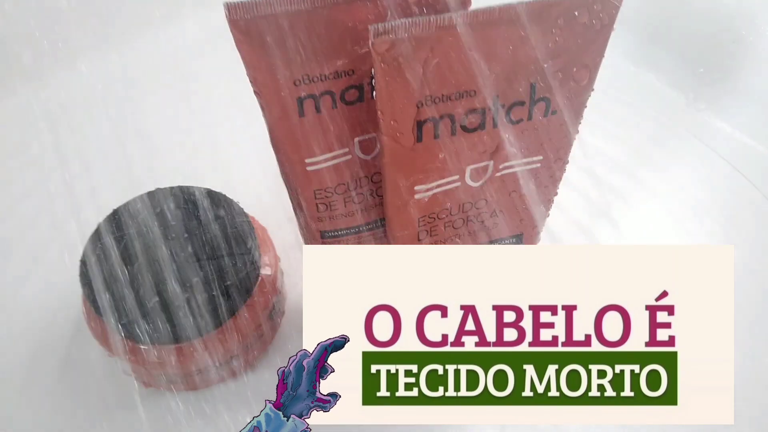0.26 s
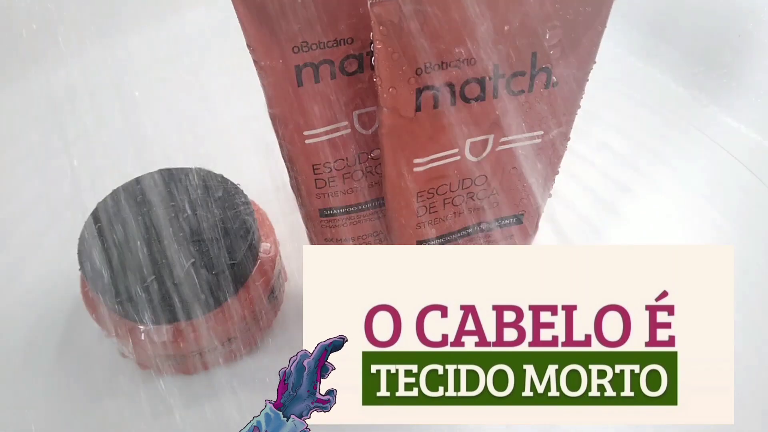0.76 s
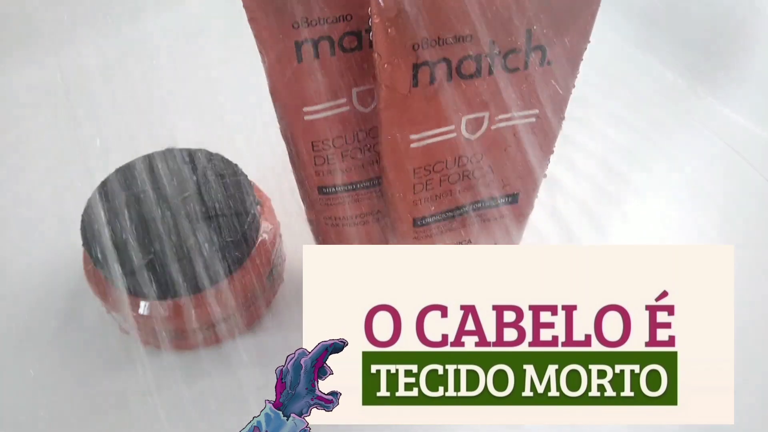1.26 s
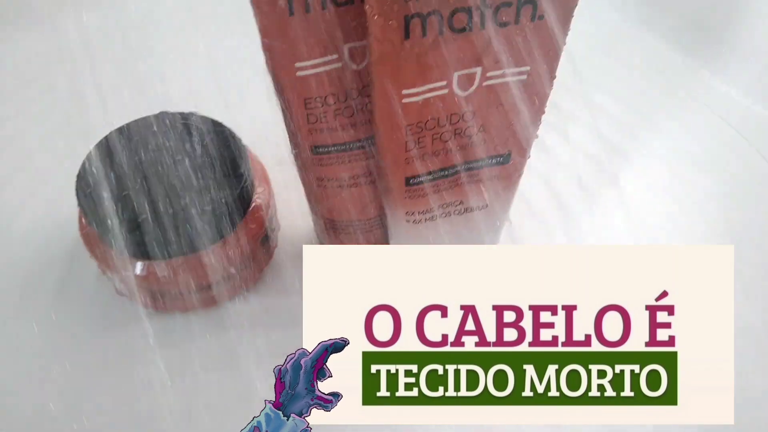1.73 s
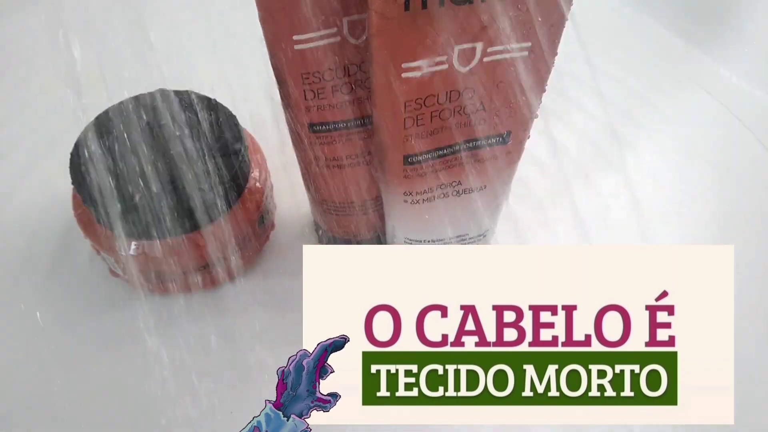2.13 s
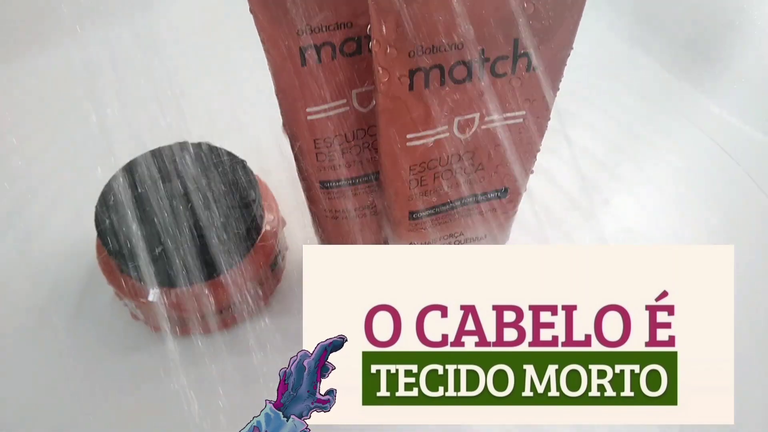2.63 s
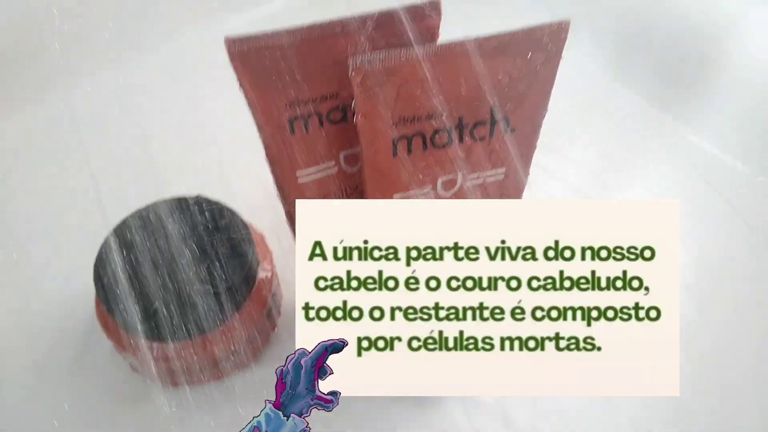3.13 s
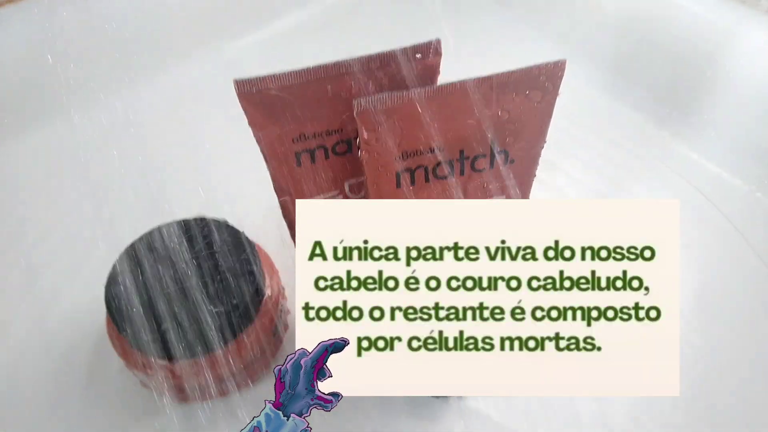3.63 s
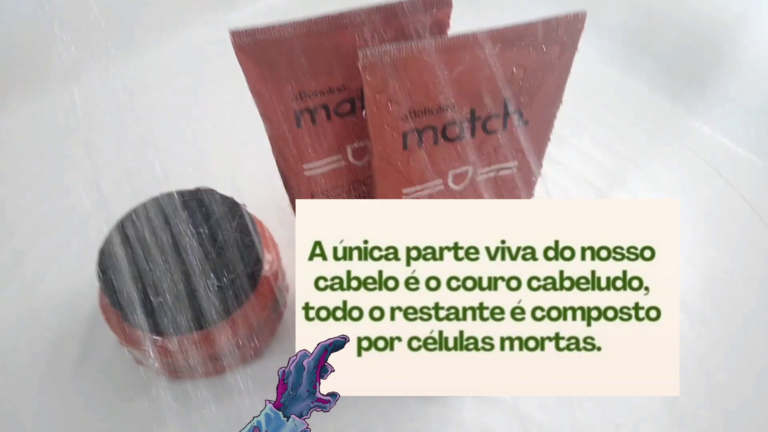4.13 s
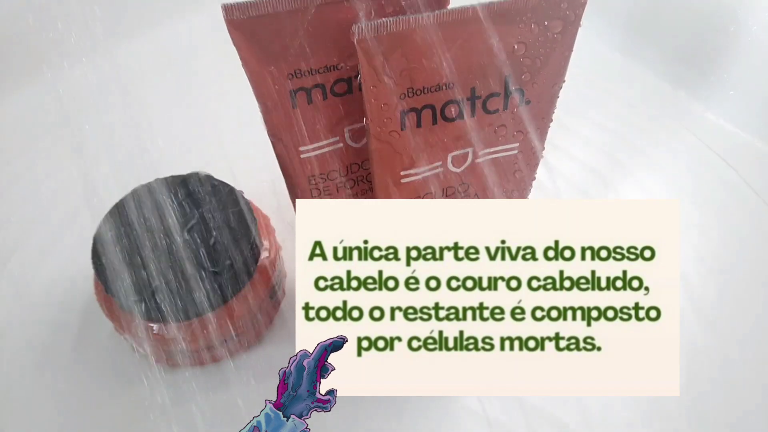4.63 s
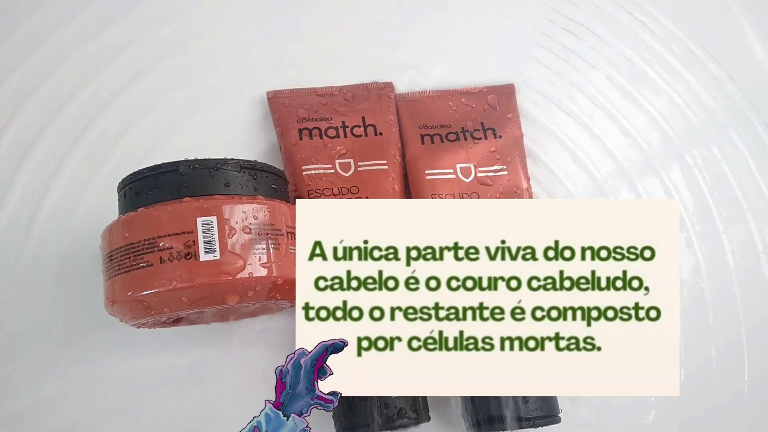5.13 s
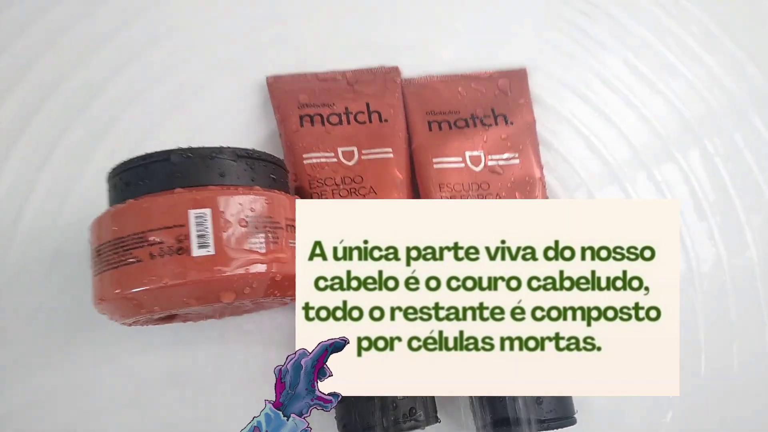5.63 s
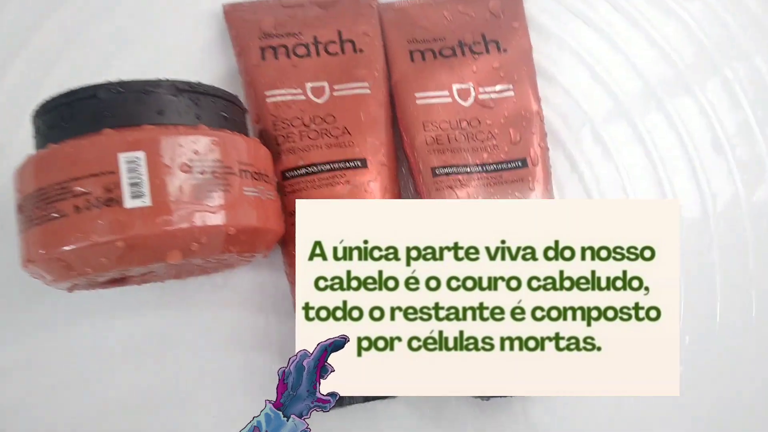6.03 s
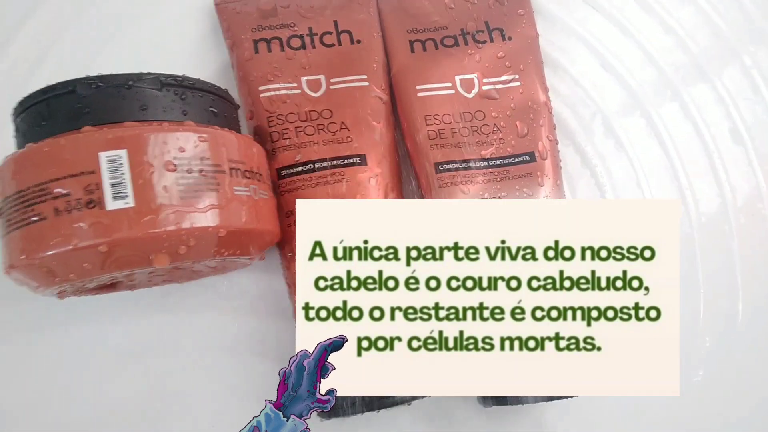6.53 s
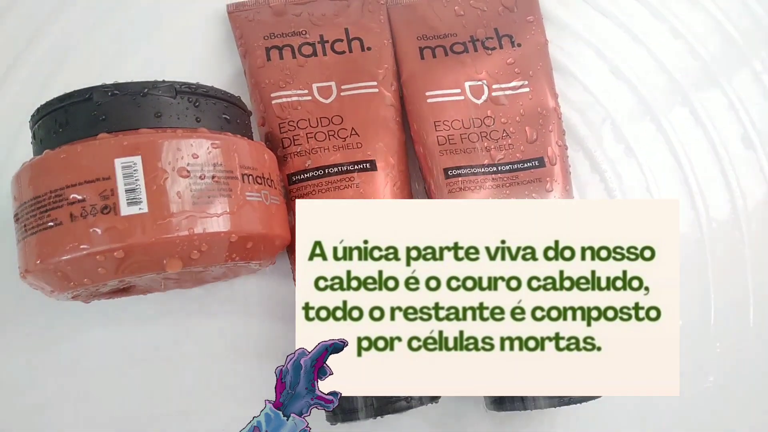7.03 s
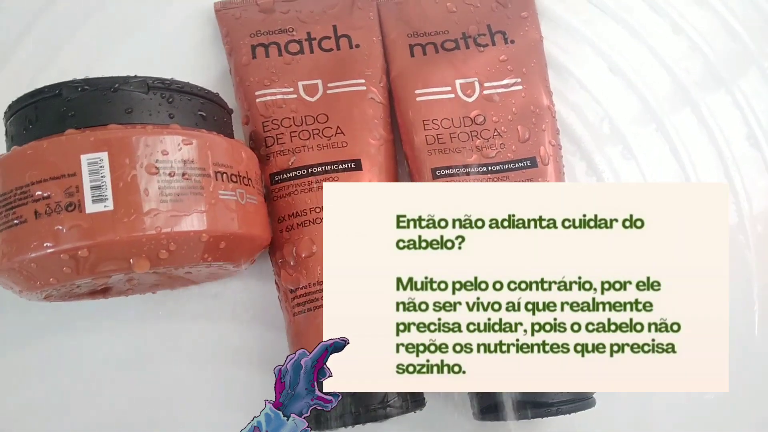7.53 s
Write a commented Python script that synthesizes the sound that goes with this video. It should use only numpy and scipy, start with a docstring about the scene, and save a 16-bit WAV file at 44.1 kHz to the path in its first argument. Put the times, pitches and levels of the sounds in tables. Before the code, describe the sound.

Shower water sprays steadily into a tub, drumming low and pattering on plastic tubes and a jar, with tiny bubbles and plops. A little past halfway the sound cuts to a brief silence. It fades back much quieter with the spray off: a thin hiss and high whistle from the valve, scattered drips and a soft handling bump. The microphone is close, in a small tiled bathroom with a faint low hum.

```python
"""A shower drums on a tub, rattles on plastic tubes and a jar, and splashes into tiny ringing bubbles.
The sound cuts to a short silence and fades back in with a soft thump. Now the spray is off: water
hisses and whistles thinly in the valve, and last drips tick off the wet plastic.
Room air and a low mains hum lie under both parts, in a small tiled room. We listen from close by,
through a hand-held phone whose two microphone ports favour different parts of the treble."""
import sys
import numpy as np
from scipy import signal
from scipy.fft import rfft, irfft, next_fast_len
from scipy.io import wavfile
from scipy.ndimage import map_coordinates

SR = 44100
rng = np.random.default_rng(int(sys.argv[2]) if len(sys.argv) > 2 else 0)


def materialize(psi):
    """Save the field psi as 16-bit PCM at rate SR to the path in sys.argv[1].

    A 1-D psi becomes a single channel; in a 2-D psi each row is a channel.
    """
    bounded = np.clip(np.atleast_2d(psi).T, -1, 1)
    quanta = np.round(bounded * 32767).astype(np.int16)
    wavfile.write(sys.argv[1], SR, quanta)


N = 342216

# Table levels are relative: each layer adds its own trim.
# strength of the spray as it plays over the objects: t/s, level/dB
SPRAY_STRENGTH = [(0, -41.5), (1.2, -41), (2.18, -41.5), (2.26, -40), (2.34, -44), (2.7, -42), (3.2, -42.5),
                  (3.7, -42.5), (4.8, -42.5)]
# the tub's modes: f/Hz, width/Hz, level/dB, left-right/dB
TUB_MODES = [(215.3, 3, -8.5, 5.5), (244.3, 13, -10, -1.5), (297, 25, -9, 3), (406, 9.3, -8.5, 0.5),
             (420, 11, -2, -2.5), (460, 30, 3.5, -1), (513, 33, -3, 2), (587, 23, -0.5, -6),
             (601, 4.3, -9.5, -10), (645, 16, -7.5, -6), (623, 12, -18, -9.5), (760, 25, -47.5, 10),
             (855, 78, -16.5, -5.5), (912, 22, -23, -9), (1080, 66, -12, -0.5), (1240, 17, -19, 7.5),
             (1345, 32, -22.5, 3)]
# resonances of the hollow tubes and the jar: f/Hz, width/Hz, lift/dB
PLASTIC_MODES = [(1558, 60, 11), (1700, 47, 8), (2000, 54, 1.5), (2700, 85, 9.5), (2890, 100, 11.5),
                 (3400, 70, 2), (3610, 29, -1), (3922, 36, 9), (4270, 120, 6.5)]
# tone of the splash, the fine mist and the room air: f/Hz, level/dB
SPLASH_EQ = [(700, -32), (950, -14), (1350, -15), (1650, -4.5), (2300, 1), (2900, -3.5), (3400, 4),
             (4200, -6.5), (5000, -9), (7000, -7.5), (11000, -70.5)]
MIST_EQ = [(2650, -9), (4500, 2), (4980, -17), (7070, 5.5), (7900, 4.5), (8550, -6), (9870, -3),
           (10900, -12.5), (12900, -16.5), (15200, -10), (16000, -23.5)]
AIR_EQ = [(20, -6), (38, -11), (75, -12), (95, -18.5), (135, -20), (200, -23), (290, -19), (340, -28),
          (560, -28), (700, -33), (1000, -33), (1200, -40.5), (1800, -62.5), (3000, -120)]
# the loudest bubbles under the spray: t/s, level/dB, f/Hz, snap/dB
LOUD_BUBBLES = [(0.1271, -22.5, 7440, -38), (0.2488, -25, 7400, -38.5), (0.2982, -20.5, 7300, -43),
                (0.3711, -14, 7400, -33), (0.4479, -25.5, 7360, -47.5), (0.6938, -23, 7370, -37.5),
                (1.4556, -35, 7300, -40), (1.7569, -30, 7650, -42), (1.9165, -20.5, 6800, -46),
                (2.0318, -22, 7840, -40.5), (2.2418, -35.5, 7280, -40), (2.4139, -29, 7190, -39),
                (2.4948, -33.5, 9960, -39), (2.6095, -32, 7200, -42), (2.7053, -30, 7500, -38),
                (2.7367, -21.5, 7660, -38), (3.1168, -36.5, 9600, -38.5), (3.3119, -34.5, 7210, -45.5),
                (3.7065, -28.5, 7400, -40), (4.0467, -30, 6450, -37), (4.4712, -28.5, 7160, -43)]
# tone of a tearing water film: f/Hz, level/dB
SNAP_EQ = [(1500, -23.5), (4500, -3.5), (7000, -1.5), (10000, 3), (12000, -10.5), (16000, -12)]
# fat drops landing in pooled water: t/s, level/dB, f/Hz
POOL_PLOPS = [(0.8147, -26.5, 2050), (1.109, -26.5, 2950), (1.6774, -28, 2920), (2.0143, -30, 2080),
              (2.2006, -26, 2040), (2.3183, -29, 2800), (3.15, -31, 2040), (3.5189, -31.5, 1930)]
# tone of the water in the valve: f/Hz, level/dB
HISS_EQ = [(900, -23), (1300, -18), (1600, -9), (2100, -7.5), (2600, -1.5), (3800, -2), (4900, -12),
           (6000, -8.5), (6800, 2), (7700, 5), (8400, -4.5), (10500, -10), (11600, -20), (15800, -19.5)]
# resonances of the valve and pipe: f/Hz, width/Hz, lift/dB
VALVE_MODES = [(1450, 48, 5), (2382, 22, 11), (2645, 77, 8), (2880, 83, 5.5), (3630, 25, 6.5),
               (3710, 46, 2.5), (5670, 70, 3.5), (5720, 55, 6.5), (6220, 89, 7.5), (7100, 68, 2),
               (7820, 83, 7.5), (7850, 47, 6.5), (9370, 97, 10.5), (9860, 27, 17), (10840, 120, 10),
               (14147, 160, 7.5)]
# the valve's main whistle: f/Hz, width/Hz, level/dB, left-right/dB
WHISTLE_MODES = [(7510, 34, 7, 0.5), (7270, 110, 3.5, 2), (7240, 69, -9, 0.5)]
# last drips off the plastic: t/s, level/dB, f/Hz, snap/dB
LAST_DRIPS = [(5.221, -37, 4800, -52), (5.4514, -33, 6330, -46), (5.946, -41.5, 4300, -50),
              (5.961, -40, 3180, -55), (6.107, -32.5, 3980, -39), (6.4333, -39, 6250, -50),
              (6.4825, -41, 7060, -43), (6.5134, -46, 9500, -34.5), (6.6326, -39.5, 2900, -39),
              (6.6677, -37.5, 6200, -39.5), (6.7845, -37.5, 3660, -50), (6.798, -29, 6770, -47),
              (7.1765, -33, 4170, -31), (7.456, -44, 5850, -39.5), (7.6264, -44, 3030, -42.5)]
# the hand on the phone: t/s, thud/dB, rub/dB
HAND_BUMPS = [(5.413, -70, -46.5), (7.122, -41, -59)]
# tone of the hand's rub: f/Hz, level/dB
RUB_EQ = [(300, -16), (900, -12), (1550, -1), (2400, -1), (5000, -14), (9000, -42.5)]
# reverb time of the tiled walls: f/Hz, t60/s
TILE_DECAY = [(300, 0.58), (3000, 0.3), (8000, 0.29), (15000, 0.12)]
# how much louder the left port hears than the right: f/Hz, left-right/dB
PORT_BALANCE = [(1200, 0.5), (2200, 3.5), (3100, 12.5), (4200, 9.5), (5000, 3), (6200, 14.5), (7200, 11),
                (8000, 23.5), (8800, -2), (9700, -9), (11000, -2.5), (13000, 0.5), (15500, 9.5)]

CUT_S, RESUME_S = 4.835, 5.192  # the silence lies between these
TOP_HZ = 15950
TIME = np.arange(N) / SR


def amp(db):
    """Decibels to gain."""
    return 10 ** (np.asarray(db) / 20)


def unit(x):
    """Scale a stereo pair so that its centre has rms 1."""
    return x / np.sqrt(np.mean(x.mean(0) ** 2) + 1e-20)


def along(points, hz):
    """Read (Hz, value) points on a log axis."""
    f, v = np.transpose(points)
    return np.interp(np.log(hz + 1), np.log(f + 1), v)


def noise(length=N):
    """Stereo white noise."""
    return rng.standard_normal((2, length))


def wobble(rate):
    """A smooth random curve, rate knots a second."""
    return map_coordinates(rng.standard_normal(int(N * rate / SR) + 4), [TIME * rate])


def filtered(x, response):
    """x through a complex frequency response."""
    size = next_fast_len(N + SR // 2)
    return irfft(rfft(x, size) * response(np.fft.rfftfreq(size, 1 / SR)), size)[..., :N]


def coloured(x, spectrum):
    """x through an EQ curve of (Hz, dB) points."""
    return filtered(x, lambda hz: amp(along(spectrum, hz)))


def panned(db):
    """Constant-power gains for a left-right difference."""
    ratio = amp(np.atleast_1d(db))
    return np.array([ratio, np.ones_like(ratio)]) * np.sqrt(2 / (1 + ratio ** 2))


def bandpass(f, hz, width):
    """Response at f of one resonance centred on hz."""
    return 1j * f * width / (hz * hz - f * f + 1j * f * width)


def resonate(x, modes):
    """x through a body's resonances, each with its own pan."""
    return filtered(x, lambda f: sum(panned(side) * amp(db) * bandpass(f, hz, width)
                                     for hz, width, db, side in modes))


def lifted(x, modes):
    """x with a narrow boost at each resonance."""
    return filtered(x, lambda f: 1 + sum((amp(db) - 1) * bandpass(f, hz, width)
                                         for hz, width, db in modes))


def spread(pair, alike):
    """Set the stereo width of two unrelated signals from (Hz, correlation) points."""
    turn = lambda hz: np.arccos(np.clip(along(alike, hz), -1, 1)) / 2
    mid, side = filtered(pair, lambda hz: np.array([np.cos(turn(hz)), np.sin(turn(hz))]))
    return np.array([mid + side, mid - side])


def nearer_right(x, lag_ms):
    """The sound reaches the right port a moment before the left."""
    return filtered(x, lambda hz: np.exp(np.pi * 1j * np.outer([-1, 1], hz) * lag_ms / 1000))


def add(track, s, sound):
    """Mix a sound into the track at time s."""
    start = max(round(s * SR), 0)
    part = track[:, start:start + sound.shape[-1]]
    part += sound[..., :part.shape[1]]


def patter(rate, size_db):
    """Two streams of drop impacts at random moments, log-normal in size."""
    hits = rng.random((2, N)) < rate / SR
    return hits * amp(size_db * np.clip(noise(), -3, 2.5)) * rng.choice([-1, 1], (2, N))


def spatter(rate, size_db, t60, wet_db):
    """Each drop shatters in a brief burst of noise and leaves a faint tail in the room."""
    age = np.arange(SR // 4) / SR
    burst, tail = amp(-120 * age / t60), amp(-120 * age / TILE_DECAY[1][1])  # power envelopes
    shape = burst / burst.sum() + amp(2 * wet_db) * tail / tail.sum()
    power = np.abs(signal.fftconvolve(patter(rate, size_db)[0] ** 2, shape)[:N])
    return np.sqrt(power) * noise()


def tub_drum():
    """Thousands of drops a second drum on the tub and ring its low modes."""
    hits = spread(patter(2500, size_db=3.5), [(200, 0.91), (460, 0.9), (650, 0.8), (1200, 0.31)])
    return nearer_right(unit(resonate(hits, TUB_MODES)), lag_ms=0.13)


def splash():
    """Drops rap and shatter on the tubes and the jar, which lend them a hollow colour."""
    raps = spread(patter(1800, size_db=2.5), [(1000, 0.5), (1700, 1), (2700, 0.59), (4000, 0.25)])
    raps = unit(nearer_right(raps, lag_ms=0.14))
    shatter = amp(2) * unit(spatter(4000, size_db=7, t60=0.0052, wet_db=-7))
    return unit(lifted(coloured(raps + shatter, SPLASH_EQ), PLASTIC_MODES))


def mist():
    """Fine droplets sizzle on top; the few nearest drops crackle out of them."""
    sizzle = unit(coloured(spatter(1700, size_db=3, t60=0.005, wet_db=-7), MIST_EQ))
    near_drops = spatter(55, size_db=15.5, t60=0.0057, wet_db=-2.5)
    crackle = coloured(near_drops, [(4000, -35), (7000, -1.5), (10000, 0), (12000, 0), (16000, -7)])
    return sizzle + amp(-6.5) * unit(crackle)


def spray():
    """One spray strength rides the levels of drum, splash and mist until the cut."""
    times, levels = np.transpose(SPRAY_STRENGTH)
    strength_db = np.interp(TIME, times, levels)
    flow = wobble(14)  # the jets wander on and off the objects
    low, middle, top = tub_drum(), splash(), mist()
    drum_db = strength_db - 1.42 + 0.68 * flow + 0.4 * wobble(6)
    splash_db = strength_db - 4.5 + 0.4 * flow
    push_db = 1.4 * (strength_db - levels.mean())  # harder jets shatter finer
    mist_db = levels.mean() - 12.5 + push_db + 0.94 * wobble(25)
    return (TIME < CUT_S) * (amp(drum_db) * low + amp(splash_db) * middle + amp(mist_db) * top)


def room_tone():
    """A bed of low room air, a subsonic sway and a wavering mains hum."""
    air = unit(coloured(spread(noise(), [(40, 0.3), (200, 0.5), (700, 0.6), (1200, 0.1)]), AIR_EQ))
    sway = unit(coloured(noise(), [(1, 0), (4, 2.5), (9, -9), (20, -12.5), (45, -64), (90, -120)]))
    hum = np.sqrt(2) * np.sin(2 * np.pi * 100.3 * TIME)
    return amp(-57) * air + amp(-52.5) * sway + amp(-68 + 1.6 * wobble(4.8)) * hum


def ping(hz, cycles, glide, swell=1.15):
    """A bubble of peak 1: it swells softly, rings for a few cycles and rises in pitch."""
    age = np.arange(SR // 80) * hz / SR  # in cycles
    fade = np.exp(-age / cycles)
    attack = 1 - np.exp(-(age / swell) ** 2)
    phase = age + glide * (age - cycles * (1 - fade))
    ring = np.sin(2 * np.pi * phase) * fade * attack
    return ring / np.abs(ring).max()


def fizz(count=80):
    """Faint bubbles burst in the film of water under the spray."""
    track = np.zeros((2, N))
    pitches = 7200 * np.exp(0.307 * rng.standard_normal(count))
    for (when, size), hz in zip(rng.random((count, 2)), pitches):
        ring = ping(min(hz, TOP_HZ), cycles=9.1, glide=0.056)
        add(track, when * CUT_S, amp(-44.5 + 10 * size ** 2) * ring)
    return track


def snap(t60):
    """A water film tears with a tick of noise."""
    age = np.arange(SR // 80) / SR
    return noise(len(age)) * amp(-60 * age / t60)


def bubbles(cues):
    """Each cue (t/s, level/dB, f/Hz, snap/dB) snaps and rings briefly, a little to the right."""
    rings, snaps = np.zeros((2, 2, N))
    for s, db, hz, snap_db in cues:
        add(rings, s, amp(db + 1) * panned(-3) * ping(hz, cycles=2.6, glide=0.011, swell=2.6))
        add(snaps, s, amp(snap_db + 12.5) * snap(t60=0.0066))
    return rings + coloured(snaps, SNAP_EQ)


def small_bubble_cues(per_s=6, most=60, snap_db=-9):
    """Small bubbles, scattered around one size, burst at random while the spray runs."""
    times = np.cumsum(rng.exponential(1 / per_s, most))
    levels = -37 + 3.5 * rng.standard_normal(most)
    pitches = 7250 * np.exp(0.074 * rng.standard_normal(most))
    return [(s, db, hz, db + snap_db) for s, db, hz in zip(times, levels, pitches) if s < CUT_S]


def plops():
    """Fat drops plop into the pooled water."""
    track = np.zeros((2, N))
    for s, db, hz in POOL_PLOPS:
        add(track, s, amp(db - 2.5) * ping(0.97 * hz, cycles=1.8, glide=0.062))
    return track


def splat_cues(at_s=3.4645, length_s=0.0015, count=5):
    """One fat drop splats into a handful of bubbles, the big low ones first."""
    times = at_s + np.linspace(0, length_s, count)
    return [(s, -22, hz, -47.5) for s, hz in zip(times, np.geomspace(4810, 8830, count))]


def plumbing(ease_at_s=5.8, ease_s=0.25):
    """With the spray off, water squeezes through the valve: a thin hiss and a whistle that eases off."""
    rush = spatter(2200, size_db=6, t60=0.018, wet_db=-1.5)
    hiss = unit(lifted(coloured(rush, HISS_EQ), VALVE_MODES))
    whistle = unit(resonate(noise(), WHISTLE_MODES))
    hiss_db = -51 + 0.27 * wobble(13)
    whistle_db = -50.5 - 6 * np.clip((TIME - ease_at_s) / ease_s, 0, 1) + 1.7 * wobble(11)
    return (TIME > CUT_S) * (amp(hiss_db) * hiss + amp(whistle_db) * whistle)


def drips():
    """Last drips fall off the wet plastic, each a tick and a short ring."""
    rings, snaps = np.zeros((2, 2, N))
    for s, db, hz, snap_db in LAST_DRIPS:
        add(rings, s, amp(db + 5) * ping(hz, cycles=3.2, glide=0.02, swell=1))
        add(snaps, s, amp(snap_db) * snap(t60=0.0097))
    return rings + coloured(snaps, SNAP_EQ)


def handling():
    """The hand softly bumps and rubs the phone."""
    track = np.zeros((2, N))
    thud = np.sin(2 * np.pi * 135 * TIME) * amp(-60 * TIME / 0.058)
    thud += 0.5 * np.sin(2 * np.pi * 250 * TIME) * amp(-60 * TIME / 0.022)
    for s, thud_db, rub_db in HAND_BUMPS:
        rub = unit(coloured(noise(), RUB_EQ)) * amp(-60 * TIME / 0.095)
        add(track, s, amp(thud_db) * thud + amp(rub_db - 1) * rub)
    return track


def bathroom(x, near_db=-1, wet_db=-4.5, near_t60=0.031):
    """Direct sound, quick reflections inside the tub and the tail of the tiled walls."""
    hz, t, bands = signal.stft(noise(SR // 3), SR, nperseg=256)
    walls = signal.istft(bands * amp(-60 * t / along(TILE_DECAY, hz)[:, None]), SR, nperseg=256)[1]
    age = np.arange(walls.shape[1]) / SR
    near = noise(len(age)) * amp(-60 * age / near_t60)
    echo = amp(near_db) * near / np.linalg.norm(near[0]) + amp(wet_db) * walls / np.linalg.norm(walls[0])
    echo = np.pad(echo, ((0, 0), (SR // 1000, 0)))  # 1 ms pre-delay
    return x + signal.fftconvolve(x, echo, axes=1)[:, :N]


def scene():
    """The full mix; the single bubbles and drops go through the bathroom reverb."""
    bed = spray() + room_tone()
    drops = fizz() + bubbles(LOUD_BUBBLES + small_bubble_cues() + splat_cues()) + plops() + drips()
    return bed + bathroom(drops) + plumbing() + handling()


def record(dry):
    """The ports colour each side; the mix mutes, then fades in on a soft thump, all under a high cut."""
    heard = filtered(dry, lambda hz: panned(along(PORT_BALANCE, hz)))
    resumed = TIME > RESUME_S
    fader = (TIME < CUT_S) + resumed * np.clip(0.044 + (TIME - RESUME_S) / 0.32, 0, 1)
    thump = resumed * amp(-47 - 60 * np.abs(TIME - RESUME_S) / 4.2)  # a step that slowly drains away
    return filtered(heard * fader + thump, lambda hz: hz < TOP_HZ)


dry = scene()
out = record(dry)
materialize(out)
```